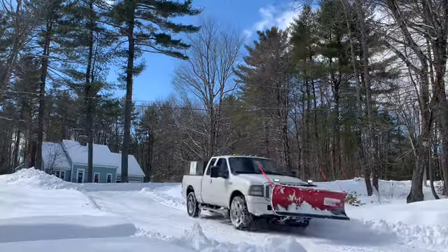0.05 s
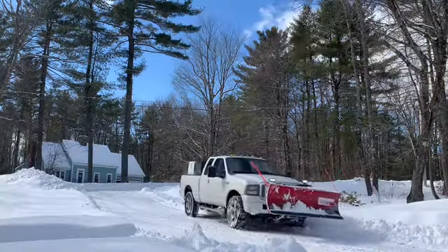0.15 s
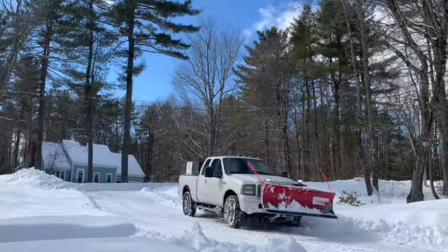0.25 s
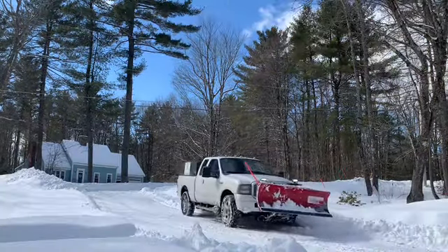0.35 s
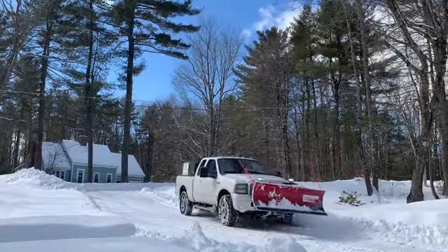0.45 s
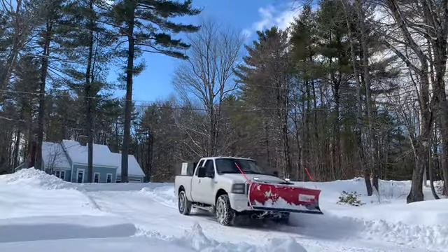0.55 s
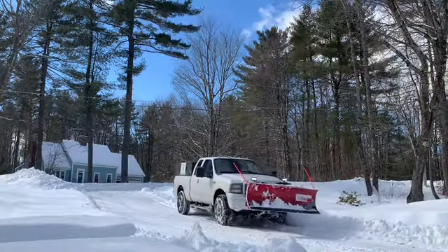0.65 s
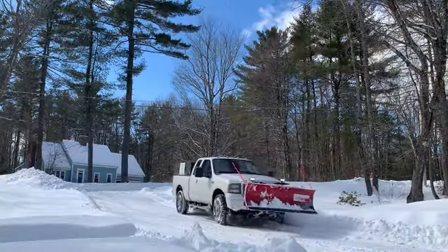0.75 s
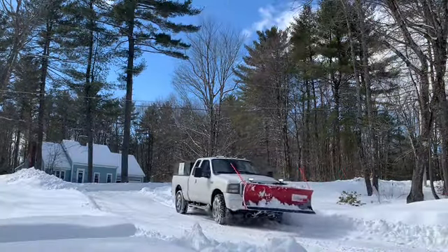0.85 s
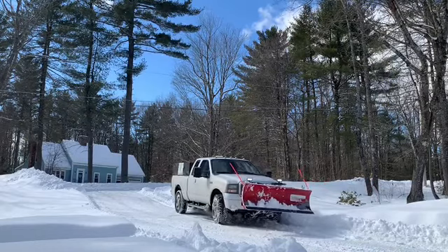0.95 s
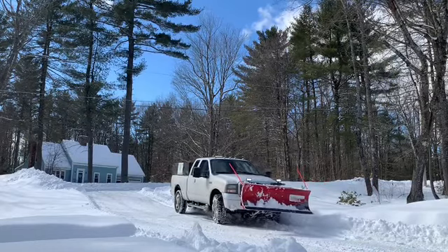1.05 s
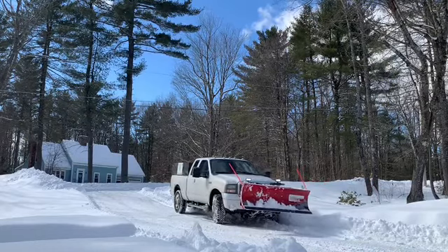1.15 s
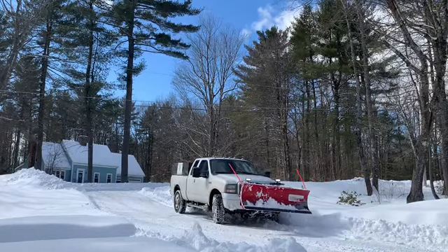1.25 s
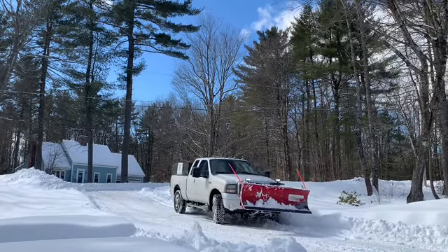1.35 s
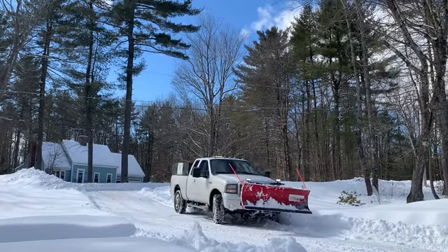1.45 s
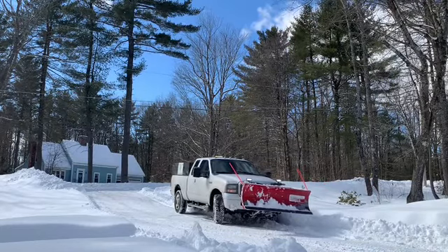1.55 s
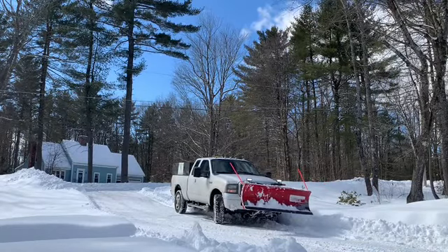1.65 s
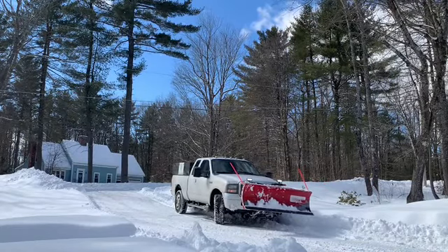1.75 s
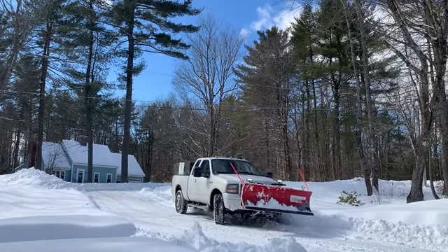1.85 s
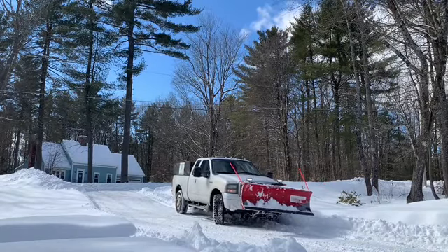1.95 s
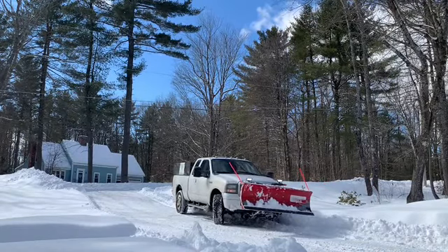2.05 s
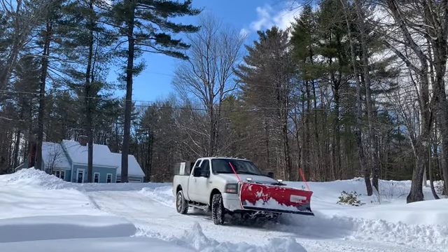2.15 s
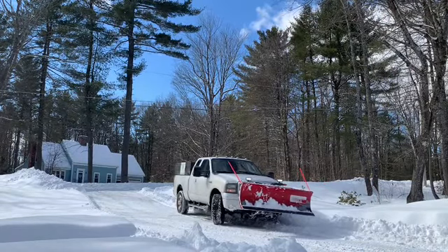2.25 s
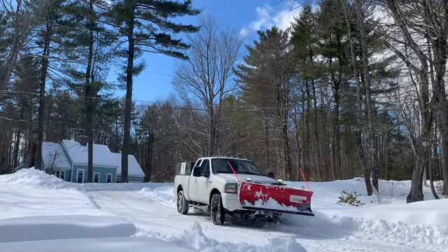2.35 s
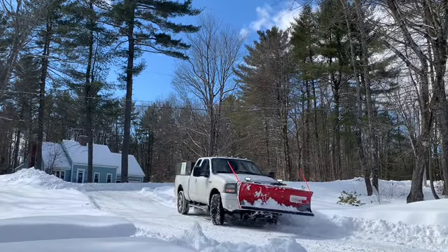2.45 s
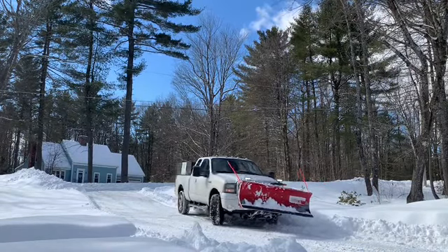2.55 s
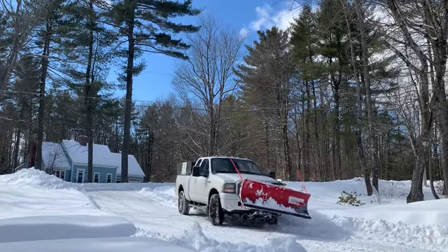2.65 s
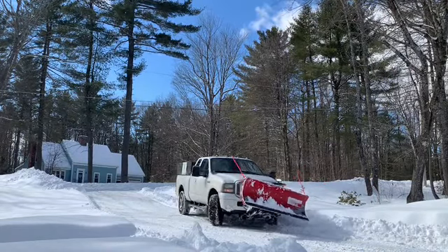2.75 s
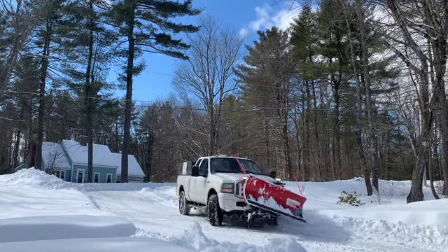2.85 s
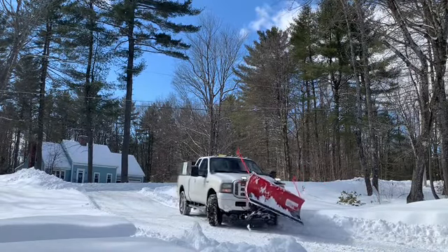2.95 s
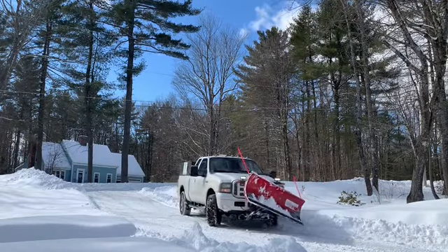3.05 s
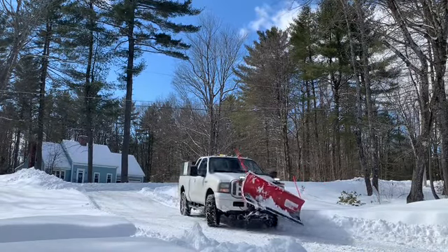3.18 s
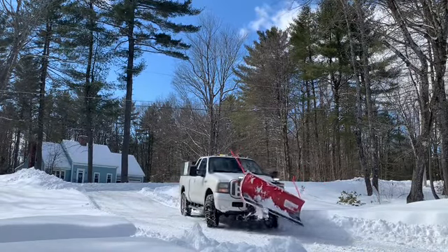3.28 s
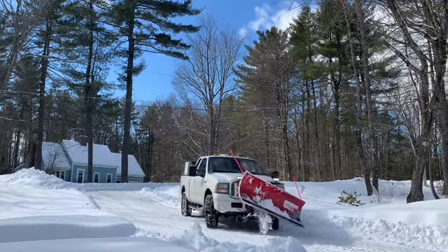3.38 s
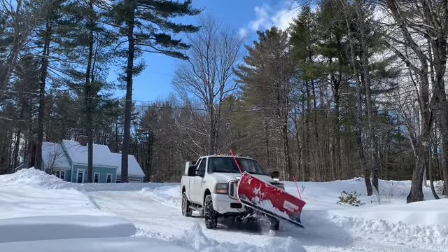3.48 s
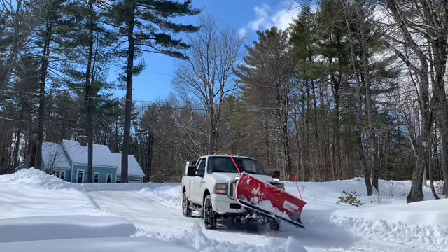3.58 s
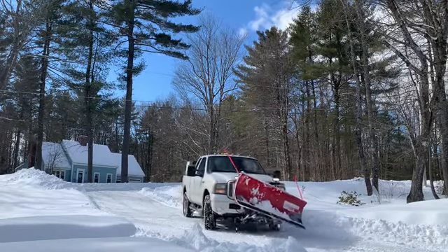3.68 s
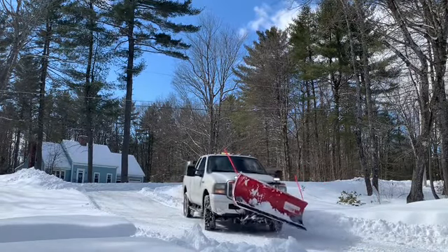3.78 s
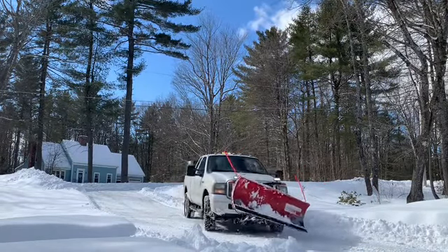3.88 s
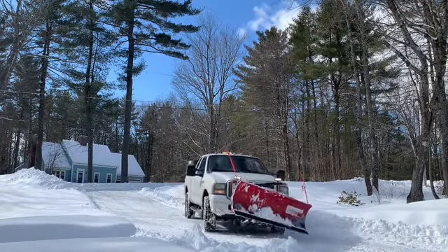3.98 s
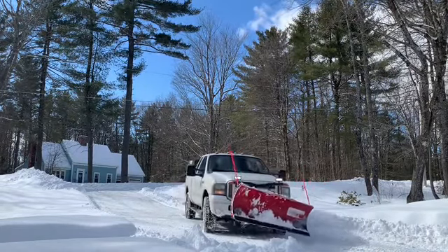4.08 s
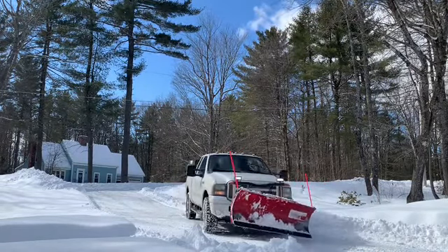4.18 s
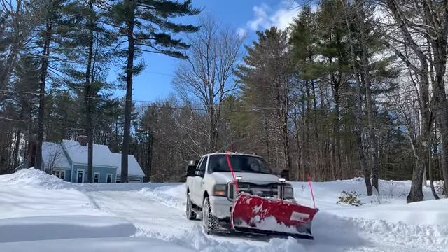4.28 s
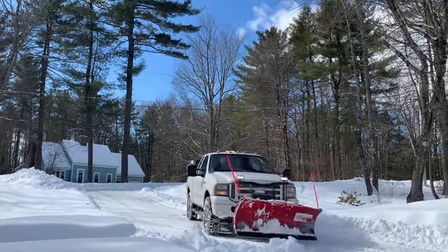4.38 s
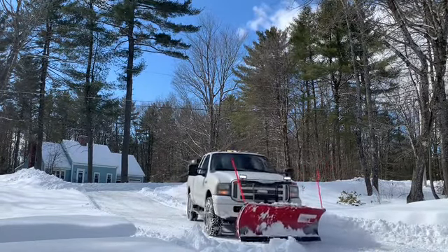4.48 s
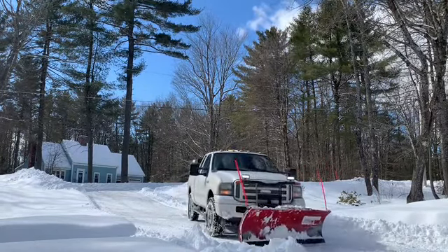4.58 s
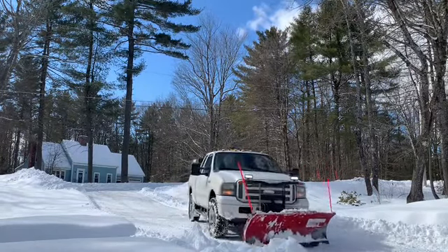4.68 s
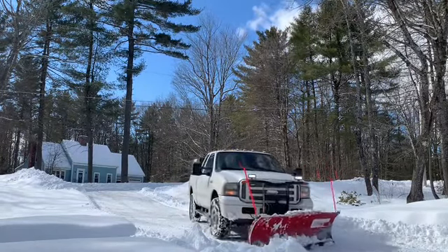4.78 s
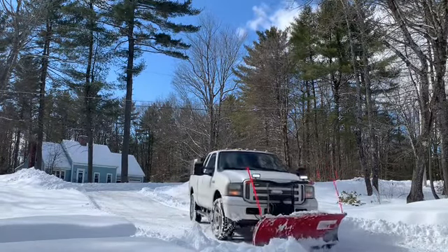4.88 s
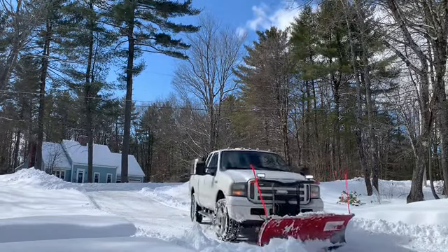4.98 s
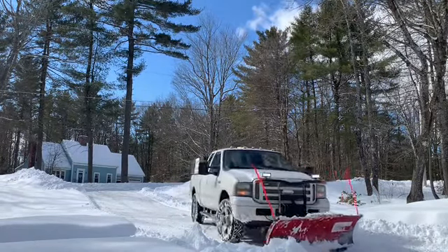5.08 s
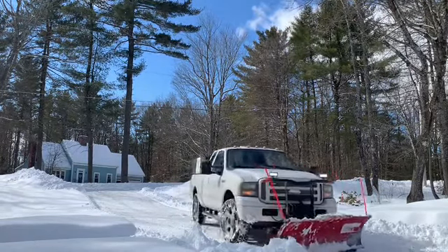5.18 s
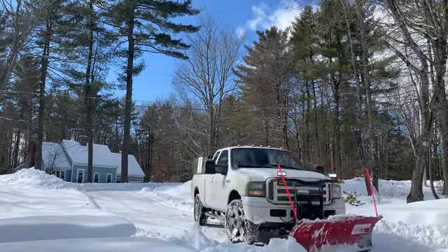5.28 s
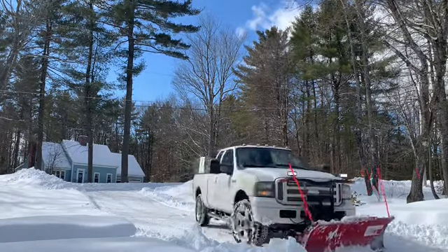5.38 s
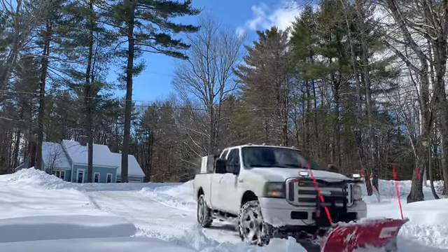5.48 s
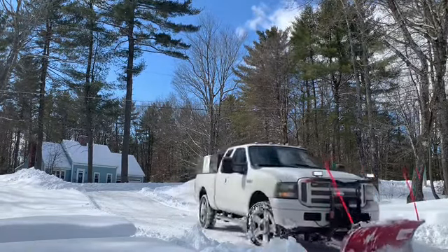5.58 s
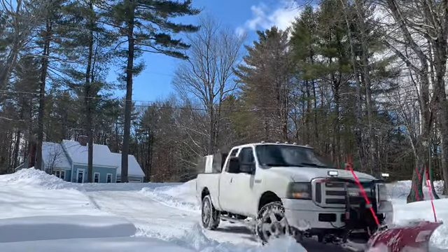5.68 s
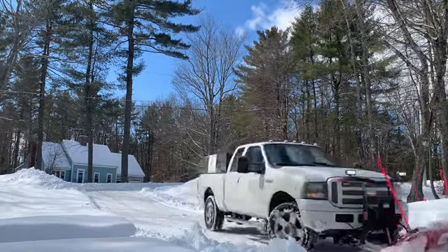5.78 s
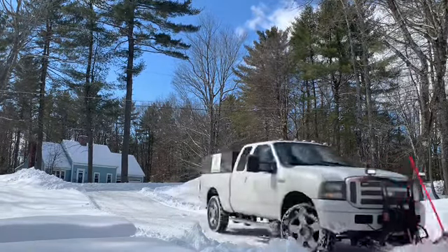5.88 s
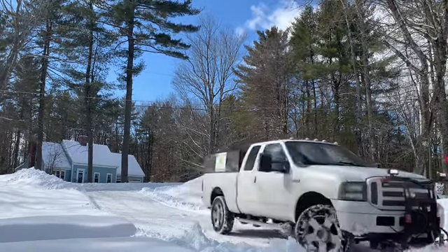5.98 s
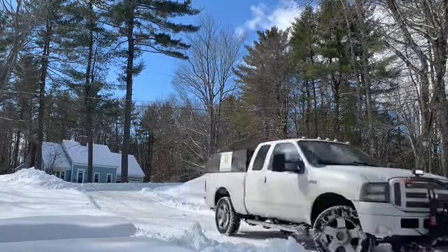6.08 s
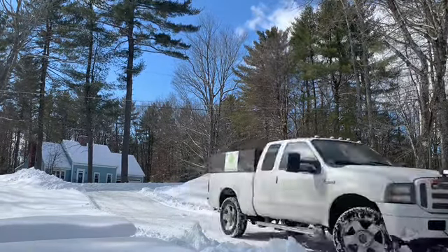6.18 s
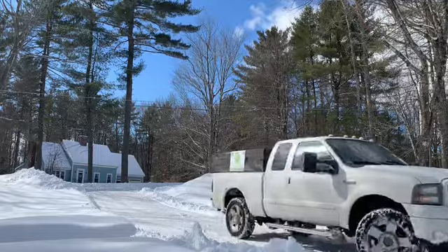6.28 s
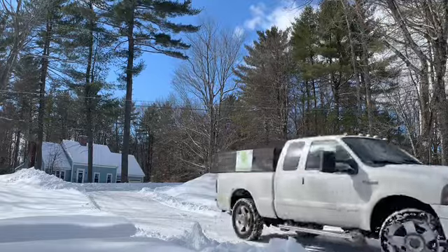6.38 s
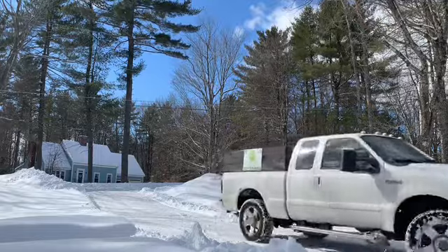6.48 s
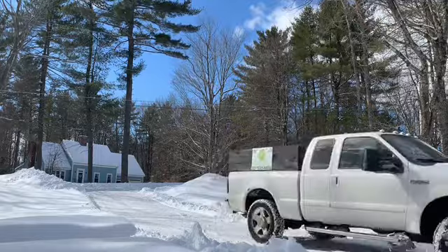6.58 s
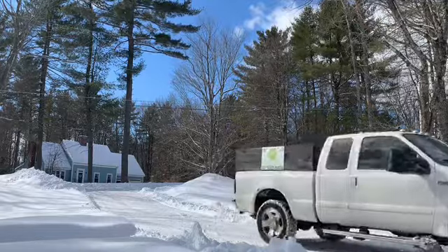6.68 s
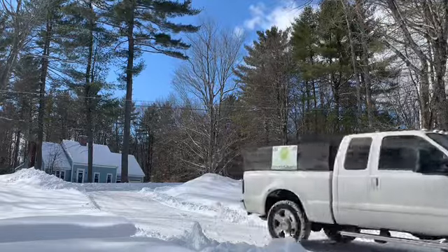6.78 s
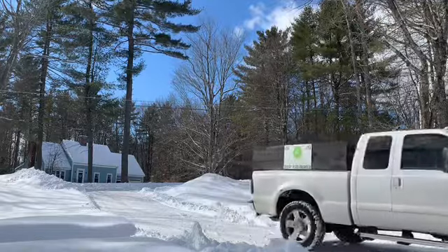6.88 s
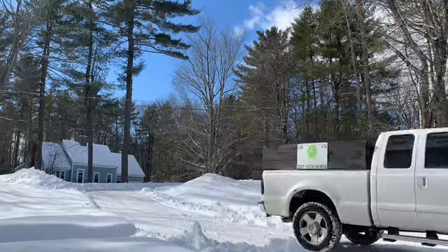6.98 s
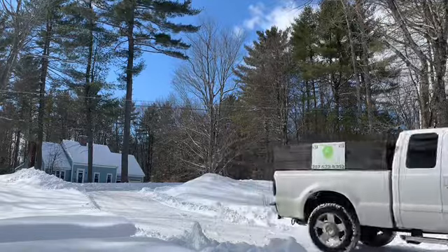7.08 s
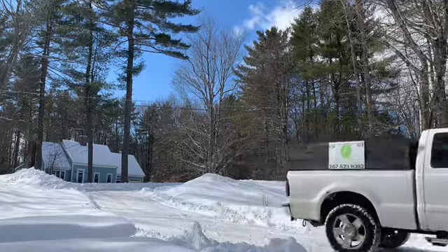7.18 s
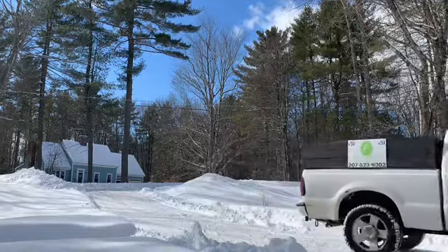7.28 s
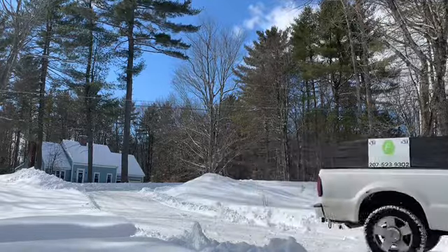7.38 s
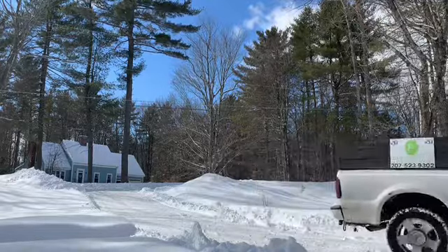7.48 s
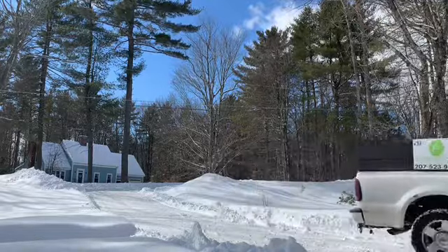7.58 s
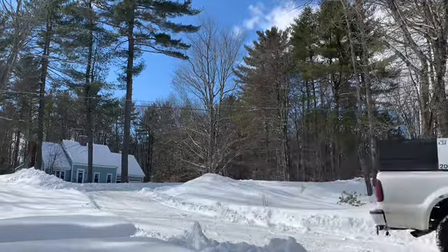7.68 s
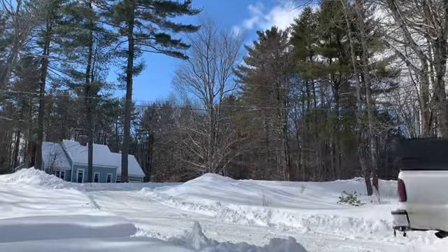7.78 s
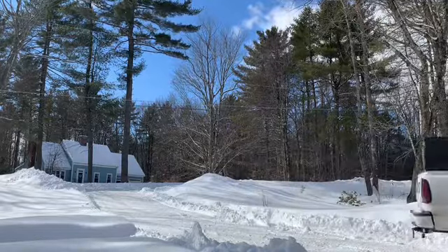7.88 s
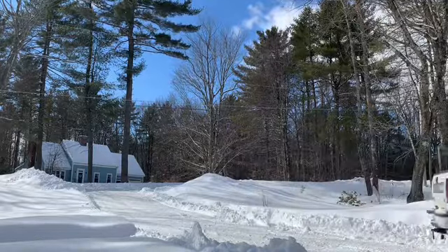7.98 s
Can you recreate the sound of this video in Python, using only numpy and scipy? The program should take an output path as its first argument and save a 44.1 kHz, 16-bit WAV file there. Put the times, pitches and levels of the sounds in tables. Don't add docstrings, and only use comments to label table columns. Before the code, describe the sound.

A big pickup idles unevenly at moderate distance in a snowy, tree-lined drive, its deep exhaust burbling in lumpy pulses with soft engine-bay rattle. From 0.3 to 2.2 s there are only light, loose metal ticks and rattles. At about 2.45 s the blade clunks; a thin hydraulic whine climbs, then a stronger one sinks slightly from 3.0 to 3.15 s amid clanks. Revs swell around 3.3 s and ease; more knocks come at 3.7 to 4.1 s, followed by a quieter spell. From 4.7 to 5.0 s the blade hits the ground in rapid hard bangs and the engine pulls up. Snow crunches and hisses around 5.4 to 5.9 s. From 6 s the truck grows loud and close, moving right, with heavy clanks, hollow booms and gritty crunching. Revs peak near 6.9 s, then fall after 7.2 s, with blows and low rumble lasting to the end at 8 s.

```python
import sys
import numpy as np
from scipy import signal
from scipy.fft import rfft, irfft, next_fast_len
from scipy.io import wavfile
from scipy.ndimage import uniform_filter1d

SR = 44100
rng = np.random.default_rng(int(sys.argv[2]) if len(sys.argv) > 2 else 0)


def attenuation_scalar(level_db):
    decades = np.asarray(level_db, float) / 20
    return 10 ** decades


def to_wav(s):
    ch = np.atleast_2d(s).T
    pcm = np.round(np.clip(ch, -1, 1) * 32767)
    wavfile.write(sys.argv[1], SR, pcm.astype(np.int16))


N = 354563
T = np.arange(N) / SR
M = next_fast_len(N + SR)
HZ = np.fft.rfftfreq(M, 1 / SR)
TOP_HZ = 15850


def unit(x):
    return x / np.sqrt(np.mean(x ** 2))


def even(x, share=1., window_s=0.22):
    x = unit(x)
    power = uniform_filter1d(x ** 2, int(window_s * SR)) + 1e-18
    return x / power ** (share / 2)


def shape(x, gain):
    return irfft(rfft(x, M) * gain, M)[..., :N]


def colour(points, hz=HZ):
    at, db = np.transpose(points)
    return attenuation_scalar(np.interp(np.log(hz + 1), np.log(at), db, left=-70, right=-70))


def body(modes, hz=HZ):
    out = 0
    for k, (f, width, db) in enumerate(modes):
        out = out + (-1) ** k * attenuation_scalar(db) * 1j * hz * width / (f ** 2 - hz ** 2 + 1j * hz * width)
    return out


def curves(table):
    s, *cols = np.transpose(table)
    return [np.interp(T, s, c) for c in cols]


def walk(rate_hz):
    k = int(SR / rate_hz)
    steps = np.repeat(rng.standard_normal(N // k + 1), k)[:N]
    return unit(uniform_filter1d(uniform_filter1d(steps, k), k))


def grit(size, db, rate_hz):
    k = int(SR / rate_hz)
    sizes = attenuation_scalar(db * np.minimum(rng.exponential(size=size // k + 1), 4))
    return rng.standard_normal(size) * np.repeat(sizes, k)[:size]


MOTTLE_DB = 4.5


def mottle(x, db):
    z = signal.stft(x, nperseg=512)[2]
    patches = uniform_filter1d(rng.standard_normal(z.shape), 2, axis=0)
    patches = uniform_filter1d(patches, 2, axis=1)
    return unit(signal.istft(z * attenuation_scalar(db * unit(patches)), nperseg=512)[1][:N])


# time in seconds, level in dB.
WORK = [(0.0, -47.5), (0.62, -51.5), (2.35, -52.5), (3.0, -43.5), (3.24, -47), (3.71, -49), (3.92, -48.5),
        (4.1, -53.5), (4.43, -51), (4.7, -43), (4.88, -38.5), (5.78, -37), (5.96, -34.5), (6.36, -33),
        (6.63, -30.5), (7.28, -29), (7.84, -31.5), (8.04, -32)]
MID_WORK_DB = -43
# frequency in Hz, level in dB.
SNOW = [(1500, -50), (2300, 11), (3400, 4.5), (4500, 4.5), (6400, 1), (7200, -5.5), (8000, -1.5),
        (9500, -4), (12000, -9), (16000, -8.5)]
SNOW_DB, SNOW_SLOPE = -54, 1.12
ROLL_S, ROLL_DB = (0.71, 4.3), (-6.5, 1)


def snow_bed():
    work_db = curves(WORK)[0] - MID_WORK_DB
    db = SNOW_DB + SNOW_SLOPE * work_db + np.interp(T, ROLL_S, ROLL_DB)
    snow = mottle(shape(grit(N, 2.4, 350.), colour(SNOW)), MOTTLE_DB)
    return snow * attenuation_scalar(db - 4.0 + 1.2 * walk(30))


# frequency in Hz, level in dB.
BAY_FRONT = [(400, 6.5), (520, -1.5), (820, 0.5), (1050, -4), (1400, -3), (1750, -11.5), (2300, -9.5),
             (2700, -13.5), (3200, -23), (3600, -22.5), (4400, -18.5), (5200, -29.5), (7000, -34.5)]
# frequency in Hz, level in dB.
BAY_SIDE = [(400, 9.5), (500, -3), (620, -5), (790, 4.5), (950, 2.5), (1150, -16), (1400, 5), (1620, 5.5),
            (1850, -1), (2100, -1.5), (2600, -6.5), (3500, -12.5), (7000, -57)]
# start in seconds, end in seconds.
TURN_S = (5.15, 7.95)
BAY_DB, BAY_SLOPE = -45.5, 1


def engine_bay(firing):
    db = BAY_DB + BAY_SLOPE * (curves(WORK)[0] - MID_WORK_DB)
    beat = 1 + 0.23 * np.exp(-(firing % 1) / 0.22)
    rattle = grit(N, 1.82, 90.) * beat
    front = unit(shape(rattle, colour(BAY_FRONT)))
    side = unit(shape(rattle, colour(BAY_SIDE)))
    turned = np.interp(T, TURN_S, (0, 1))
    bay = mottle((1 - turned) * front + turned * side, MOTTLE_DB / 2)
    return bay * attenuation_scalar(db + 1.13 * walk(9))


SLIDE_S, SLIDE_LENGTH_S, SLIDE_HZ, SLIDE_WIDTH_HZ, SLIDE_DB = 5.4, 0.35, 6030, 590, -51.5


def slide():
    env = np.sin(np.pi * np.clip((T - SLIDE_S) / SLIDE_LENGTH_S, 0, 1)) ** .5
    hiss = shape(grit(N, 2.5, 120.), body([(SLIDE_HZ, SLIDE_WIDTH_HZ, 0)]) ** 2)
    return attenuation_scalar(SLIDE_DB + 4.0 * walk(25.28)) * unit(hiss) * env


# start in seconds, level in dB, lowest frequency in Hz.
SNAPS = [(.668, -64, 5000), (.85, -54, 595), (2.892, -43, 595), (2.93, -49, 4500), (4.031, -52, 590),
         (4.889, -32, 3500), (4.849, -35, 900), (1.718, -64, 600), (2.149, -66, 1500), (2.441, -62, 3000),
         (3.467, -53, 600), (3.738, -49, 5000), (4.063, -52, 620), (4.726, -44, 500), (4.75, -48, 3000),
         (4.795, -43, 3000), (4.981, -30, 1200), (5.768, -28, 1500), (5.512, -31, 1200), (5.44, -39, 2000),
         (4.982, -47, 3500), (6.071, -51, 3500), (6.985, -44, 4500), (7.19, -32, 5000), (7.611, -32, 6000),
         (5.439, -32, 4000), (5.511, -41, 2500), (5.769, -43, 4500), (5.845, -53, 4500),
         (6.069, -28.5, 596), (6.644, -37, 5500), (6.716, -30, 1200), (6.802, -34, 5500),
         (6.942, -38, 5500), (7.19, -32, 1500), (7.497, -38, 4000), (7.612, -29.5, 2500),
         (7.757, -35, 6000), (7.928, -42, 5000)]
SNAP_FADE_S = 0.012
CONTACT = 6


def snaps():
    t, out = T[:SR // 10], np.zeros(N + SR)
    for s, db, low_hz in SNAPS:
        band = signal.butter(2, [low_hz, min(5 * low_hz, TOP_HZ)], "band", fs=SR, output="sos")
        push = rng.standard_normal(len(t))
        push[0] = CONTACT
        burst = unit(signal.sosfilt(band, push))
        out[int(s * SR):][:len(t)] += attenuation_scalar(db - 60 * t / SNAP_FADE_S) * burst
    return out[:N]


# start in seconds, pitch
# in Hz, level in dB, fade in seconds.
RINGS = [(2.474, 349, -25.5, 0.098), (.66, 5400, -59.5, .15), (.38, 1600, -54, .06), (.7, 2120, -55, .06),
         (.855, 1300, -52, .06), (2.55, 4250, -59, .25), (2.474, 4700, -50, 0.051),
         (2.901, 2530, -42, 0.16), (2.923, 4900, -43.5, 0.11), (2.988, 4240, -46, 0.052),
         (4.71, 750, -43, 0.064), (4.748, 2380, -29, 0.058), (4.813, 2480, -37, 0.052),
         (4.837, 1400, -21, 0.04), (4.875, 2200, -37, 0.071), (4.887, 4850, -30, 0.055),
         (4.897, 2160, -26, 0.077), (4.926, 1350, -36, 0.092), (4.985, 4330, -39, 0.02),
         (5.42, 2270, -38, .08), (5.44, 3700, -40, 0.045), (5.512, 3500, -33, 0.035),
         (5.669, 5900, -40, 0.032), (5.767, 5630, -35, 0.038), (5.77, 2280, -37, 0.04),
         (5.801, 2910, -29, 0.08), (5.77, 807, -37, .2), (5.88, 820, -39, 0.33), (5.545, 3500, -43, .04),
         (5.565, 6100, -45, 0.086), (5.843, 4930, -29, 0.028), (5.905, 1490, -34, 0.11),
         (6.069, 810, -26, 0.06), (6.071, 1320, -41, 0.062), (6.175, 823, -35, 0.28),
         (6.21, 5300, -54, 0.099), (6.55, 784, -28, 0.097), (6.713, 1380, -33, .1),
              (6.716, 3180, -38, .05), (6.818, 5430, -34, .05), (7.13, 770, -28, .08),
              (7.88, 2110, -37, 0.13), (6.22, 337, -21.5, 0.2), (6.6, 440, -35, 0.18),
              (6.644, 6400, -36, 0.04), (6.74, 585, -34, 0.17), (6.781, 4600, -37, .05),
              (6.801, 6350, -38, .08), (6.941, 6340, -37, 0.048), (6.983, 6100, -36, 0.039),
              (7.059, 500, -39.5, 0.29), (7.19, 369.5, -19.5, 0.27), (7.2, 6200, -45, 0.11),
              (7.2, 3270, -52, .25), (7.372, 375, -21.5, 0.35), (7.413, 4500, -28, 0.064),
              (7.414, 6130, -46, 0.071), (7.61, 2840, -34.5, 0.35), (7.68, 514, -31, 0.43),
              (7.685, 3400, -32, 0.063), (7.899, 373, -23.5, 0.44)]
RING_WIDTH = 0.092
RISE_S, HOLD_S = .0015, .014


def rings():
    t, out = T[:SR // 3], np.zeros(N + SR)
    for s, hz, db, fade_s in RINGS:
        mode = signal.iirpeak(hz, 1 / RING_WIDTH, SR)
        push = signal.lfilter(*mode, grit(len(t), 2.6, 260.))
        push = signal.lfilter(*mode, push)
        start_s = max(RISE_S, 3 / hz)
        fading_s = np.maximum(t - min(HOLD_S, 2 * start_s), 0)
        env = (1 - np.exp(-t / start_s)) * attenuation_scalar(-60 * fading_s / max(fade_s, .02))
        out[int(s * SR):][:len(t)] += attenuation_scalar(db) * even(push, 1., .03) * env
    return out[:N]


# start in seconds, strength in dB, brightness in dB, fade in
# seconds.
RATTLES = [(0.2822, -47, 11, 0.56), (.383, -47, 0, 0.15), (0.444, -49, -7, 0.28), (0.549, -48, -5, 0.26),
           (0.6585, -47, 11.5, 0.26), (0.675, -55, 15, .15), (0.7004, -41, 0, 0.059),
           (.851, -46.5, -11.5, 0.077), (1.208, -50, 9, 0.96), (1.3104, -47, 6, 0.28),
           (1.6404, -48.5, 6, .16), (1.717, -49.5, 7, 0.37), (2.149, -52.5, -20.5, 0.053),
           (3.4664, -48, -9, 0.51), (4.253, -48, -4, .14)]
# start in seconds, strength in dB, brightness in dB, fade in seconds.
LIFTS = [(2.4391, -37, -5.5, 0.14), (2.4725, -39, 2.5, 0.79), (3.11, -33, 1, 0.18),
         (3.7275, -34.5, -2.5, 0.37), (3.8036, -34.5, -5, 0.11), (3.8491, -40, -7, 0.82),
         (3.921, -43, -2, 0.42), (4.0278, -41, -6, 0.1), (4.061, -46, -9.5, 0.24), (4.4508, -49, -3, 0.14),
         (4.5727, -34.5, -0.5, 0.033)]
# start in seconds, strength in dB, brightness in dB, fade in seconds.
HARD_BLOWS = [(2.8948, -29.5, -2, 0.63), (2.93, -26.5, 5.5, 0.31), (2.9594, -28.5, -4, 0.29),
              (2.9894, -30.5, 0.5, 0.31), (3.069, -23.5, -10, 0.09), (3.7474, -33.5, 4.5, 0.067),
              (4.7254, -21.5, -9, 0.14), (4.7483, -18, 2, 0.12), (4.7712, -19, 0.5, 0.2),
              (4.7982, -17.5, 1, 0.13), (4.8144, -24.5, -2.5, 0.2), (4.8389, -22.5, -9, 0.16),
              (4.8614, -34, 4, 0.17), (4.8861, -16, 5.5, 0.13), (4.9194, -23, -9, 0.088),
              (4.9821, -23, 3.5, 0.12), (6.0684, -18, -1, 0.11), (6.342, -23.5, -1.5, 0.6),
              (4.876, -23.5, -1, 0.15), (4.9, -26.5, -13.5, 0.14), (4.935, -29.5, 5.5, 0.15),
              (6.4691, -19.5, 2, 0.58), (6.5694, -17, 2, 0.081), (6.5949, -19.5, -4, 0.14),
              (6.7146, -15.5, 1, 0.085), (7.0803, -22.5, -8, 0.068), (7.9299, -24.5, 0, 0.36),
              (7.9774, -29, 9, 0.47)]
# start in seconds, strength in dB, brightness in dB, fade in seconds.
CRUNCHES = [(5.067, -42.5, 10, 0.049), (5.4121, -31.5, -2, 0.11), (5.439, -27, 2.5, 0.04),
            (5.511, -29.5, 6, 0.074), (5.5477, -41.5, 12.5, 0.13), (5.573, -41, 3, 0.28),
            (5.671, -36, -1, 0.028), (5.765, -28, -2, 0.35), (5.8017, -26.5, 1, 0.081),
            (5.845, -27.5, 4.5, 0.059), (5.814, -33, 0, 0.041), (5.89, -38.5, -0.5, 0.24),
            (6.1, -32.5, 0.5, 0.2), (6.181, -31, -3, 0.081), (6.4092, -31, 0.5, 0.13),
            (6.6425, -27, -1, 0.042), (6.545, -28, -1, 0.24), (6.582, -33.5, 8, 0.11),
            (6.695, -30.5, 6.5, 0.43), (6.799, -35, 10.5, 0.053), (6.822, -32, 7, 0.098),
            (6.854, -35.5, 7, 0.11), (6.9, -36, 4, .15), (7.129, -41, 9, 0.054), (7.44, -25, -1.5, 0.11),
            (7.309, -30, -3, 0.16), (6.94, -28, -2, 0.055), (6.9824, -21.5, -5, 0.065),
            (7.011, -19.5, -2.5, 0.41), (7.1891, -18, 0.5, 0.36), (7.2282, -24, 7.5, 0.11),
            (7.261, -41, 14, 0.098), (7.4096, -29, -7.5, 0.54), (7.497, -23, -2, 0.17),
            (7.539, -39, 11, .12), (7.87, -30, -5, .2), (7.6072, -18.5, -1.5, 0.42),
            (7.6425, -18.5, -4.5, 0.23), (7.6767, -24, 4, 0.15), (7.704, -42.5, 17.5, 0.14),
            (7.757, -26.5, 2.5, 0.24)]
# blade boom in dB, crack in dB, spray in dB, boom lost in dB per dB of brightness.
KINDS = [
    (1.5, -14.5, -28.5, 1.09),
    (7, -12.5, -19.5, 0.87),
    (1, -14, -16.5, 0.65),
    (-8, -3, -7, 2.5),
]
# frequency in Hz, width in Hz, level in dB.
BLADE = [(313, 38, -1), (546, 120, -8), (886, 230, -4.5)]
# frequency in Hz, width in Hz, level in dB.
FRAME = [(1130, 180, -1), (1380, 226, 4), (1652, 96, 4), (2160, 230, -1), (2500, 69, -14.5)]
PATCHY_DB, PATCH_HZ, TICK_DB = 2.5, 70, 7.5
HOLD_SHARE, DETUNE = .12, .05


def knocks():
    size, lead = 2 ** 14, 256
    hz, t = np.fft.rfftfreq(size, 1 / SR), T[:size // 2]
    blade = body(BLADE, hz) * colour([(200, -20), (320, 8.5), (950, -2.0), (1300, -23)], hz)
    frame = body(FRAME, hz) * colour([(800, -24), (1150, 2.0), (2600, 2.5), (4000, 0)], hz)
    crack = colour([(2300, -8), (2800, -0.5), (3600, 2.0), (5200, -0.5), (6200, -52)], hz)
    spray = colour([(4800, -49.0), (5600, 6.5), (6500, 7.0), (8000, 4.5), (9500, 5.0),
                    (12000, -7.5), (16000, -7.0)], hz)
    parts = np.array([g / np.sqrt(np.mean(np.abs(g) ** 2)) for g in (frame, blade, crack, spray)])
    knots = np.arange(0, SR / 2, PATCH_HZ)
    late = np.exp(-2j * np.pi * hz * lead / SR)
    out = np.zeros(N + size)
    for rows, (boom_db, crack_db, spray_db, lost) in zip((RATTLES, LIFTS, HARD_BLOWS, CRUNCHES), KINDS):
        for s, db, bright, fade_s in rows:
            fading_s = np.maximum(t - min(HOLD_S, HOLD_SHARE * fade_s), 0)
            env = attenuation_scalar(-60 * fading_s / max(fade_s, .02) + TICK_DB * np.exp(-t / .005))
            env = env * (1.2 - np.exp(-t / RISE_S))
            parts_db = np.array([0, boom_db - lost * bright, crack_db + bright, spray_db + bright])
            gain = attenuation_scalar(db - 17.5 + parts_db) @ parts
            gain = np.interp(hz * (1 + DETUNE * rng.standard_normal()), hz, gain)
            patches = attenuation_scalar(PATCHY_DB * np.interp(hz, knots, rng.standard_normal(len(knots))))
            blow = grit(size // 2, 2.6, 260.)
            blow[:2] += CONTACT * 5
            i = int(s * SR) - lead
            out[i:i + size] += irfft(rfft(blow * env, size) * gain * patches * late, size)
    return out[:N]


# start in seconds, length in seconds, first pitch in Hz, final pitch in Hz, level in dB.
STROKES = [
    (2.47, .43, 515, 860, -51),
    (2.57, .17, 1225, 2100, -54),
    (2.99, .17, 945, 872, -37),
]
# settling time in seconds, overtones at start in dB, overtones at end in dB.
PRESSURE = [
    (.12, -18, 4),
    (.8, -25, -25),
    (.07, -24, -24),
]
# multiple of the pitch, level in dB.
PUMP_ORDERS = [(2, 0), (3, -22), (4, -16), (5, -12), (6, -15)]
STROKE_EDGE_S = .03


def pump():
    out, waver, flicker_db = 0, 1 + .003 * walk(40), 2.0 * walk(25)
    orders = [(k, db + 3.0 * walk(30)) for k, db in PUMP_ORDERS]
    for (s, length_s, first_hz, final_hz, db), (settle_s, *over) in zip(STROKES, PRESSURE):
        t = np.clip(T - s, 0, length_s)
        hz = final_hz + (first_hz - final_hz) * np.exp(-t / settle_s)
        turn = 2 * np.pi * np.cumsum(hz * waver) / SR
        over_db = np.interp(t, (0, length_s), over)
        tone = np.sin(turn)
        for k, order_db in orders:
            tone = tone + attenuation_scalar(over_db + order_db) * np.sin(k * turn)
        edges = np.clip(np.minimum(t, length_s - t) / STROKE_EDGE_S, 0, 1)
        out = out + attenuation_scalar(db + flicker_db) * tone * edges
    return out


# time in seconds, engine speed in cycles per second.
REVS = [(0, 7), (.6, 5.55), (1.2, 5.85), (1.7, 6.6), (2.1, 5.5), (2.7, 7.05), (3.25, 8.62), (3.45, 8.45),
        (3.8, 6.4), (4.35, 5.6), (4.8, 8.6), (5.18, 9.8), (5.68, 8.62), (6.5, 10.72), (6.9, 10.85),
        (7.17, 10.45), (7.6, 7.6), (8.04, 7.05)]
FLYWHEEL_S = .12


def revs_now():
    return uniform_filter1d(curves(REVS)[0], int(FLYWHEEL_S * SR), mode="nearest")


BANK = [1, -1, -1, 1, -1, 1, 1, -1]
CYLINDER_DB = [-1.5, -2, 12.5, -1.5, 9, -3.5, -5, 0.5]
SCATTER_DB, JITTER, START_PULSE = 1.1, .008, 3.7
COMMON, COMMON_RISE, COMMON_REVS, COMMON_SPAN = 0.75, 0.62, 7.42, 1.29


def firing_pulses(firing, revs):
    common = COMMON + COMMON_RISE * np.exp(-((revs - COMMON_REVS) / COMMON_SPAN) ** 2)
    count = np.arange(1, int(firing[-1]))
    jitter, scatter = rng.standard_normal((2, len(count)))
    at = np.interp(count + JITTER * jitter, firing, np.arange(N)).astype(int)
    loose = (10 / revs[at]) ** 2
    size = attenuation_scalar(np.array(CYLINDER_DB)[count % 8] + SCATTER_DB * scatter * loose)
    pulses = np.zeros(N)
    pulses[0] = START_PULSE
    pulses[at] = size * (common[at] + np.array(BANK)[count % 8])
    return pulses


# frequency in Hz, width in Hz, level in dB.
MUFFLER = [(50.84, 4.9, 7), (69.5, 21.6, 1.5), (82.6, 24.5, 3.5)]
# frequency in Hz, width in Hz, level in dB.
PIPE = [(101.5, 15, 0), (120, 17.2, 5.5), (140.14, 7.4, 7)]
# frequency in Hz, width in Hz, level in dB.
TAIL = [(143, 75, -8.5), (234.3, 31.6, 0.5), (287, 21.9, 0), (327.6, 23.1, -0.5), (374, 30, -5.5)]
GAS_DB = [-14, -12, 2]
# level against load in dB, dB per dB of load, dB per cycle/s, share of own swell kept 0-1,
# loss off throttle in dB.
OUTLETS = [
    (-3.5, 1.28, 0.55, 0.46, 3),
    (-7, 1.41, -1.13, 1, 0.3),
    (-9.5, 1.4577, -0.4, 0.64, 1.1),
]
HELD_DB = [-1.5, -10.5, 0.1]
# time in seconds, level in dB.
LOAD = [(0.0, -25), (0.4, -32), (0.8, -31), (1.3, -30.5), (1.52, -28.5), (2.17, -35.5), (2.51, -27),
        (2.57, -30), (2.93, -24), (3.47, -25.5), (3.54, -28.5), (4.01, -27), (4.23, -33.5), (4.93, -21.5),
        (5.57, -23), (6.72, -16), (8.02, -24), (8.04, -19.5)]
# time in seconds, pipe and panel in dB, muffler in dB.
HUM_SWELLS = [(0.2, -1, -6), (.4, -6.5, 1), (.6, 1.5, -3), (.9, 4, -2.5), (1.0, -14, -2), (1.4, -5, -3.5),
              (1.55, -4, -4), (1.95, -1, -5), (2.1, -4.5, 3), (2.4, 1, -0.5), (3.3, 1.5, -1), (3.7, -0.2, -3),
              (4.1, -5.5, -5.5), (4.4, 12, 0), (4.9, 9, 0.3), (5.85, 3, -1.5), (6.1, 1.5, 0.5), (6.45, -2, -1),
              (7.3, 3, 0), (8.04, -3, -1.5)]
MID_LOAD_DB, MID_REVS = -28, 8
PASS_S, PASS_DB = 7.13, (-0.5, 2, 2.5)
COAST_RATE, COAST_HOLD_S = 4, .5
IDLE_GAS_DB, IDLE_REVS = 13, 7.2
GAS_SPREAD = 2.8
DRONE_S, DRONE_LENGTH_S, DRONE_HZ, DRONE_WIDTH_HZ, DRONE_DB = 3.62, 1.66, 103.4, 24, -7.5
PANEL_HZ, PANEL_WIDTH_HZ, PANEL_DB = 136.7, 6.7, -14


def exhaust(firing):
    load_db, revs = curves(LOAD)[0] - MID_LOAD_DB, revs_now()
    pipe_step_db, muffler_step_db = curves(HUM_SWELLS)
    held = np.sin(np.pi * np.clip((T - DRONE_S) / DRONE_LENGTH_S, 0, 1))
    hold = int(COAST_HOLD_S * SR)
    falling = np.clip(-np.gradient(revs) * SR / COAST_RATE, 0, 1)
    coast = uniform_filter1d(falling, hold, origin=hold // 4)
    pulses = firing_pulses(firing, revs)
    gas = rng.standard_normal(N) * np.exp(-(firing % 1) / 1.63)
    out = 0
    outlets = zip((MUFFLER, PIPE, TAIL), (muffler_step_db, pipe_step_db, 0), GAS_DB, OUTLETS, PASS_DB, HELD_DB)
    for modes, step_db, gas_db, (db, per_db, per_rev, kept, coast_db), pass_db, held_db in outlets:
        db = MID_LOAD_DB + db + per_db * load_db + per_rev * (revs - MID_REVS)
        db = db - coast_db * coast + pass_db * (T > PASS_S) + held_db * held + step_db
        steep = body(modes)
        steep *= np.sqrt(np.abs(steep))
        flow = steep
        if modes is MUFFLER:
            gas_db = gas_db + IDLE_GAS_DB * np.clip(IDLE_REVS - revs, 0, 1)
            flow = body([(f, GAS_SPREAD * width, d) for f, width, d in modes]) ** 2
        voice = even(shape(pulses, steep), 1 - kept)
        voice = voice + attenuation_scalar(gas_db) * unit(shape(gas, flow))
        out = out + attenuation_scalar(db) * even(voice, 1 - kept)
    drone = even(shape(pulses, body([(DRONE_HZ, DRONE_WIDTH_HZ, 0)]) ** 2))
    panel = even(shape(pulses, body([(PANEL_HZ, PANEL_WIDTH_HZ, 0)]) ** 2), 0.12)
    out = out + (1 - held) * attenuation_scalar(MID_LOAD_DB + load_db + pipe_step_db + PANEL_DB) * panel
    return out + held * attenuation_scalar(MID_LOAD_DB + load_db + DRONE_DB) * drone


# frequency facing in Hz, frequency from the side in Hz, width in Hz, depth 0-1.
GROUND_DIPS = [(1038, 1130, 109, 0.59), (1880, 1770, 210, 0.23), (3500, 3520, 280, 0), (426, 584, 48, 0.37)]


def ground(x):
    facing, side, width, depth = np.transpose(GROUND_DIPS)[:, :, None]
    dips = [np.prod(1 - depth / (1 + (2 * (HZ - hz) / width) ** 2), axis=0) for hz in (facing, side)]
    turned = np.interp(T, TURN_S, (0, 1))
    return (1 - turned) * shape(x, dips[0]) + turned * shape(x, dips[1])


ECHO_DB, ECHO_HZ, ECHO_BASS_DB = -2.5, 352, -18.5
ECHO_T60, ECHO_SHARED, ECHO_MOVES_S = .11, .45, (3, 7.5)


def tree_echo(truck, high):
    tails = rng.standard_normal((2, 2, N)) * attenuation_scalar(-60 * T / ECHO_T60) * (T > .004)
    tails = np.array([[1], [-1]]) * tails[:, :1] + ECHO_SHARED * tails[:, 1:]
    tails /= np.sqrt(np.sum(tails ** 2, axis=-1, keepdims=True))
    treble = attenuation_scalar(ECHO_BASS_DB) + 1 / (1 + (ECHO_HZ / (HZ + 1)) ** 4)
    moved = np.interp(T, ECHO_MOVES_S, (0, np.pi / 2))
    before, after = (shape(truck, rfft(tail, M) * treble * (1 - .2 * high)) for tail in tails)
    return attenuation_scalar(ECHO_DB) * (np.cos(moved) * before + np.sin(moved) * after)


# time in seconds, lag in samples.
LAG = [(0, -1.5), (4.5, -1.1), (5.5, 2.5), (6.2, 8), (6.8, 13), (8.04, 15.5)]
# frequency in Hz, level in dB.
RIGHT_LIFT = [(400, -2.5), (650, 4), (1300, 0), (3500, 0.5), (5600, 7.5), (7000, 4.5)]
PAN_DB_PER_SAMPLE, NEAR_DB = 0.07, 0.72
PORT_HZ, PORT_TURN_HZ, PORT_EVEN_HZ = 6800, 4800, 6200
SHADE, SHADE_RISE = 0.16, 0.35


def ports(truck):
    lag = curves(LAG)[0]
    left = np.interp(np.arange(N) - lag, np.arange(N), truck) * attenuation_scalar(-PAN_DB_PER_SAMPLE * lag)
    right = shape(truck, attenuation_scalar(np.interp(HZ, *np.transpose(RIGHT_LIFT), left=.4)))
    high = 1 / (1 + (PORT_HZ / (HZ + 1)) ** 16)
    turn = np.pi * (HZ - PORT_EVEN_HZ) / PORT_TURN_HZ
    shade = SHADE + SHADE_RISE * np.clip((HZ - 2 * PORT_TURN_HZ) / PORT_TURN_HZ, 0, 1)
    step = np.cos(turn) * np.abs(np.cos(turn)) ** shade + 1j * np.outer([-1, 1], np.sin(turn))
    near = shape(np.array([left, right]), 1 - high)
    top = shape(truck, high * step * attenuation_scalar(6.5))
    return attenuation_scalar(NEAR_DB) * (tree_echo(truck, high) + near + top)


def scene():
    firing = 8 * np.cumsum(revs_now()) / SR
    truck = snow_bed() + engine_bay(firing) + slide() + snaps() + rings() + knocks() + pump() + exhaust(firing)
    return ports(ground(truck))


def low_pass(x):
    return signal.sosfilt(signal.butter(12, 16820, fs=SR, output="sos"), x)


def record(dry):
    x = signal.sosfilt(signal.butter(6, 39., "high", fs=SR, output="sos"), dry)
    x = signal.sosfilt(signal.ellip(8, .2, 50, TOP_HZ, fs=SR, output="sos"), x)
    return low_pass(x)


dry = scene()
out = record(dry)
to_wav(out)
```